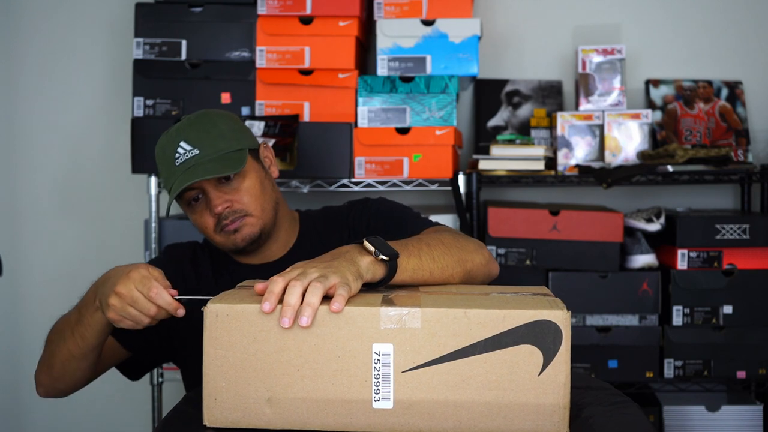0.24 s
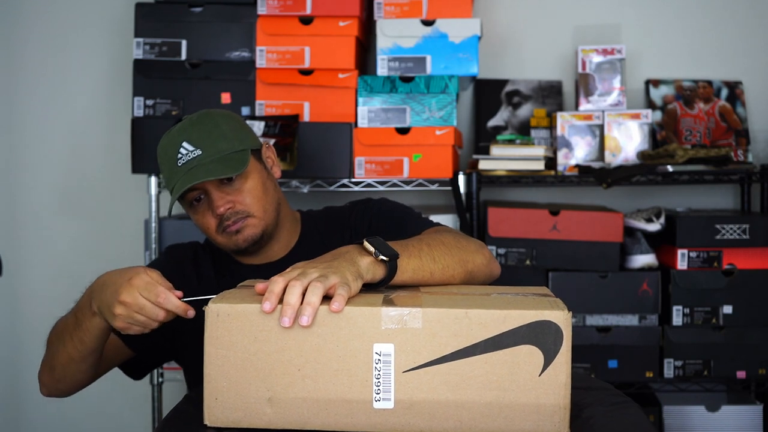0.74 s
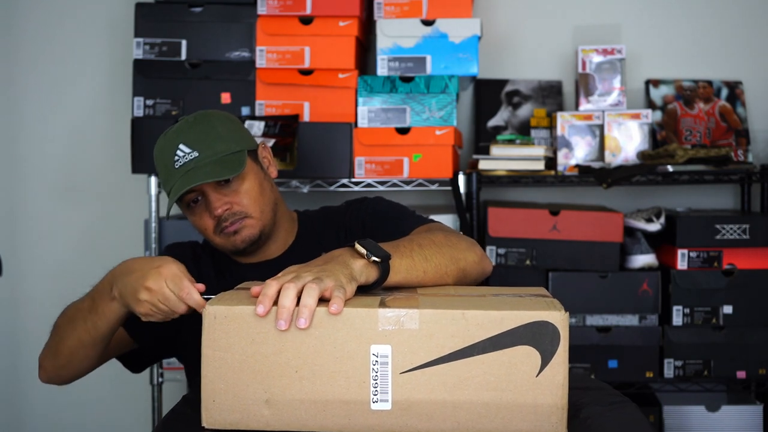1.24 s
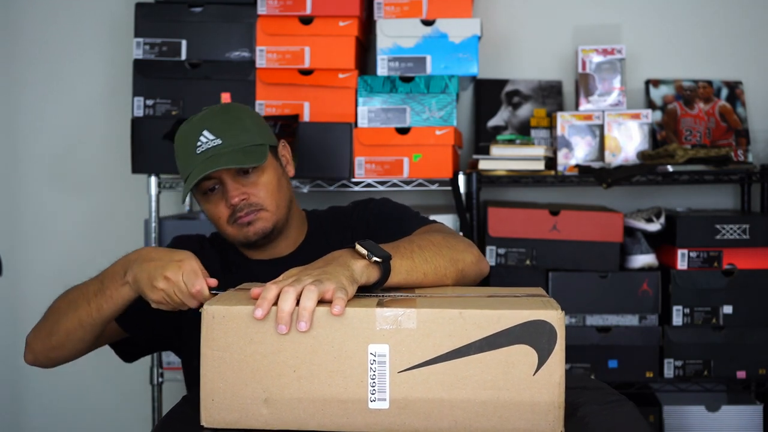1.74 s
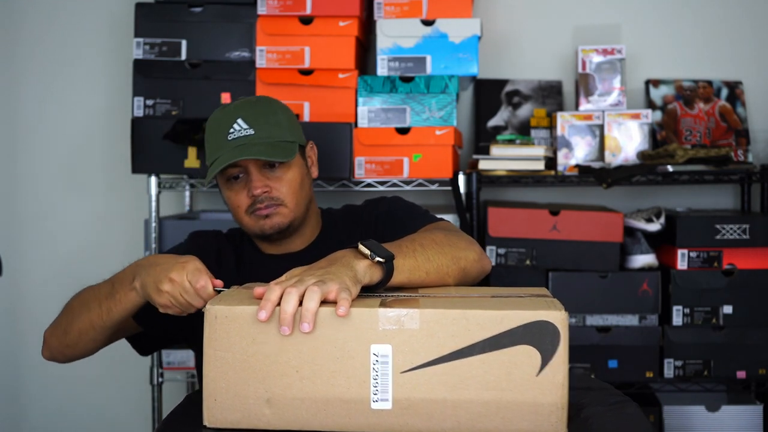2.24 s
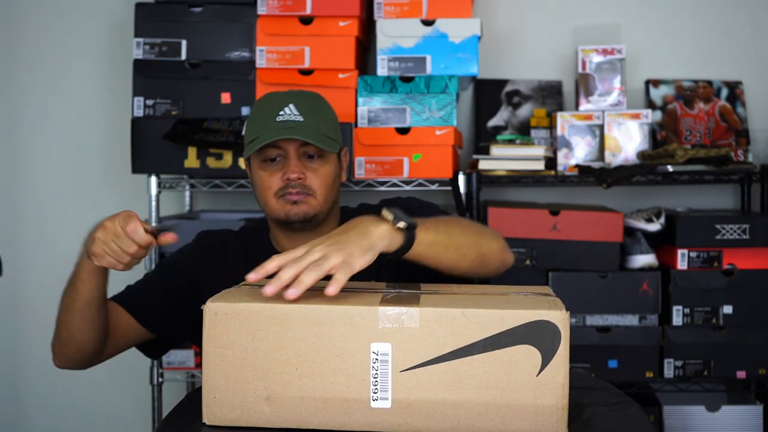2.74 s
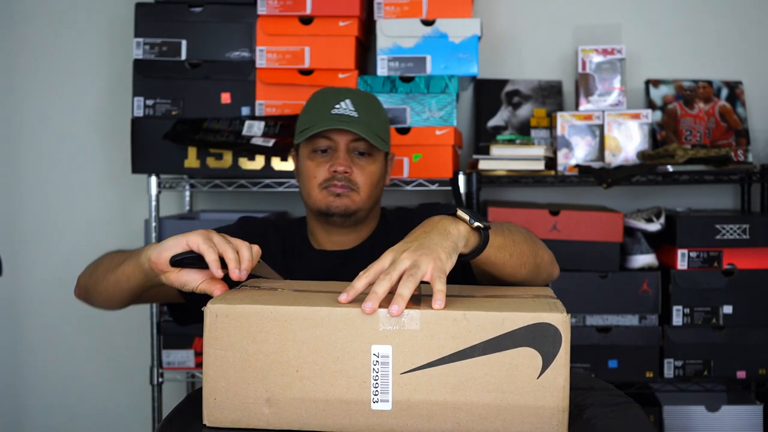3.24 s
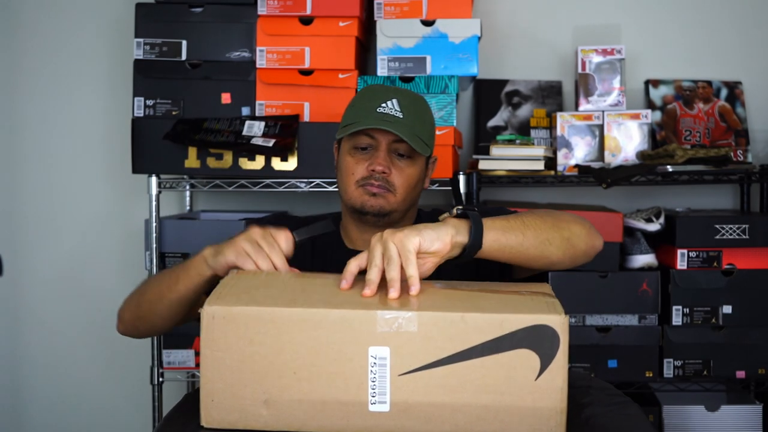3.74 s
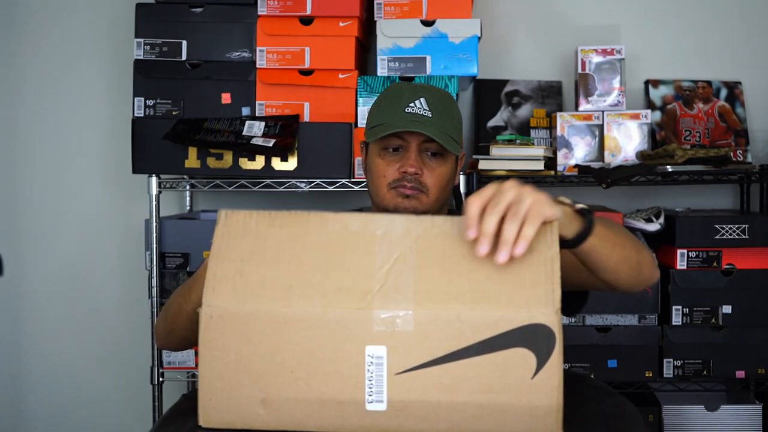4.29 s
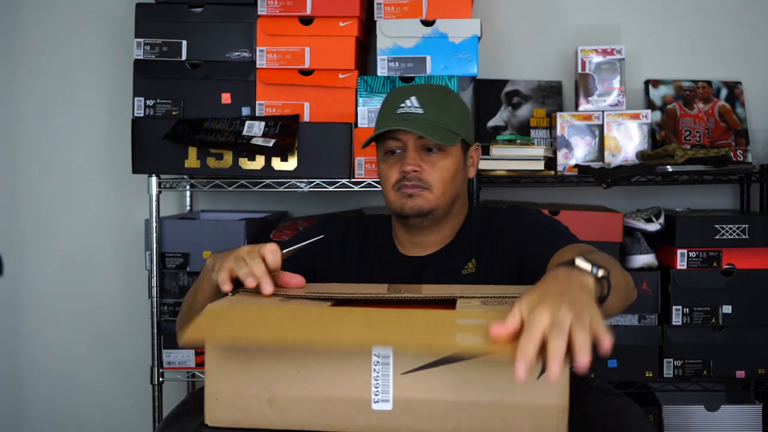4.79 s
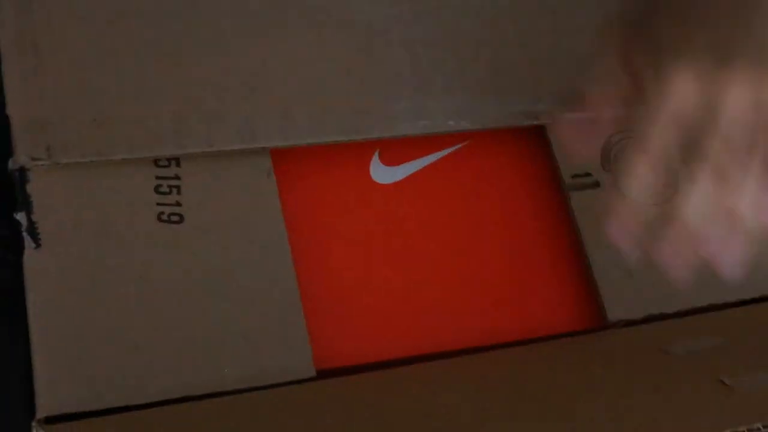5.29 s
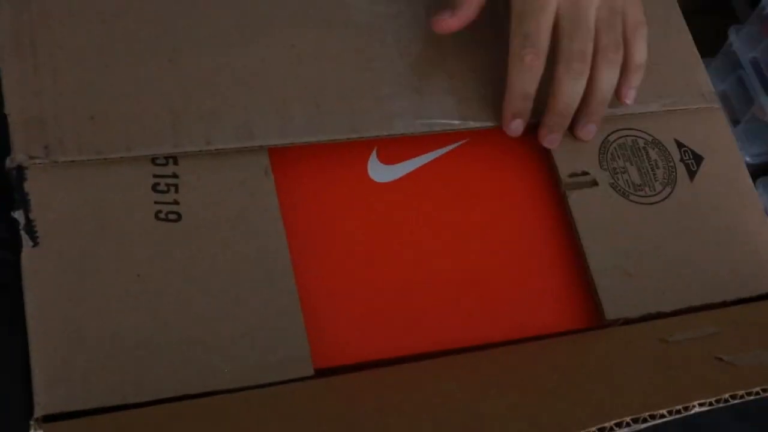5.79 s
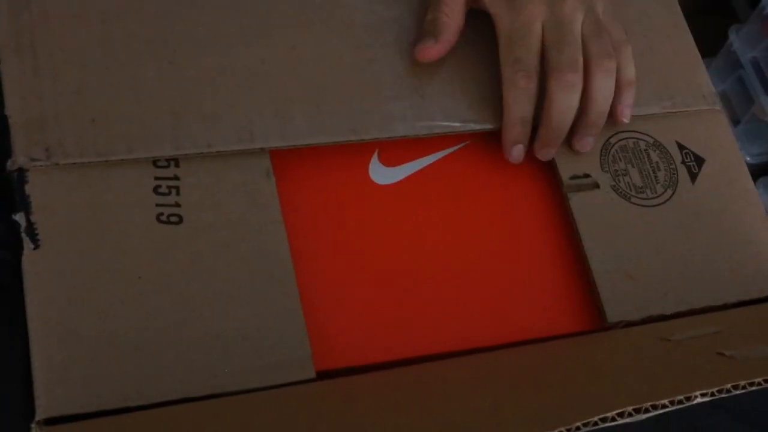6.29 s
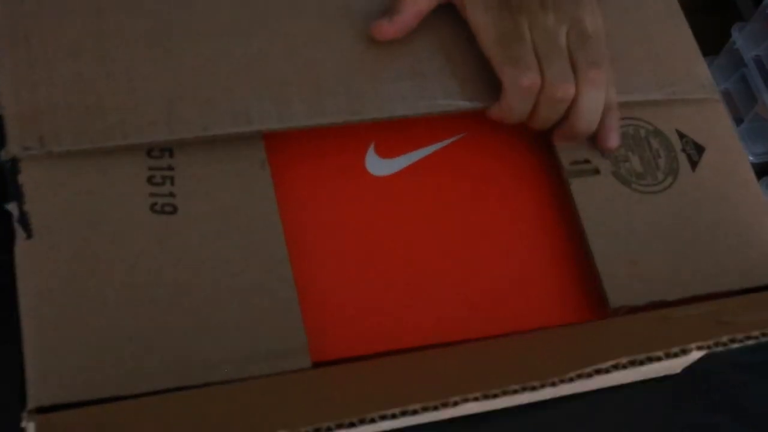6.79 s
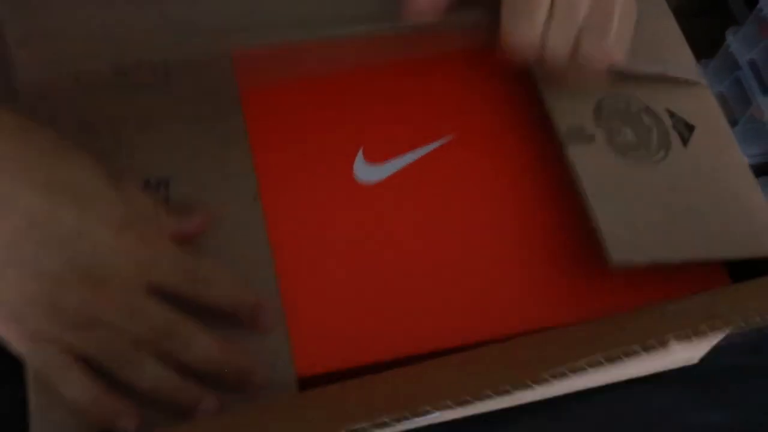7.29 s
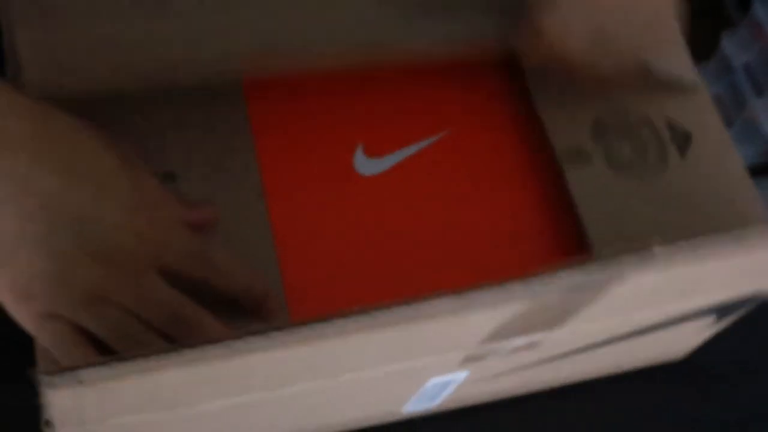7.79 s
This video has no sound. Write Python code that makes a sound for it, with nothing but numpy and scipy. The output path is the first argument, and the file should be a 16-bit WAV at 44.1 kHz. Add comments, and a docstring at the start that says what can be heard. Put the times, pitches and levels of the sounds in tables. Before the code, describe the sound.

A taped cardboard box is cut open indoors, near the microphone. Faint scratches grow into rasping knife strokes with short squeaks and hollow knocks. Sharp cracks follow as the tape gives way and the flaps scrape open. Things go briefly quiet, leaving a low hum and rumble, then the knife clicks and rattles as it is put down. Finally the cardboard is bent and pressed with loud crunching and dull thumps.

```python
"""Cutting open a taped cardboard box

A knife saws through packing tape in a quiet room, close up. Stick-slip friction booms in the hollow
box, crunches in the corrugation and hisses off the surface. The tape snaps and squeaks, flaps are
pulled open, the knife is laid aside with a rattle and hands push the flaps down with dull thuds.
A faint hum and rumble fill the pauses."""
import sys
import numpy as np
from scipy import signal
from scipy.io import wavfile
from scipy.ndimage import uniform_filter1d

SR = 44100
rng = np.random.default_rng(int(sys.argv[2]) if len(sys.argv) > 2 else 0)


def store_wav(level_fs):
    """Save 16-bit WAV to argv[1]."""
    pcm = np.round(np.clip(np.atleast_2d(level_fs), -1, 1) * 32767)
    wavfile.write(sys.argv[1], SR, pcm.T.astype(np.int16))


N = 354123

# resonances of the air in the box, its panels and its corrugated wall: f/Hz, width/Hz, gain/dB
CAVITY_MODES = [(99.4, 30.4, -4.5), (115.4, 24.6, 0), (143.6, 26.8, -0.5), (207.5, 29.6, 2.5),
                (285.5, 65, -4), (327.6, 32.6, 1)]
PANEL_MODES = [(422, 36, 0), (456, 25, 3), (509, 24.7, 1), (543.4, 23, 0), (606, 51, -9.5)]
FLUTE_MODES = [(692, 167, 0.5), (833.5, 99, 6), (1096, 244, 0.5), (1227, 169, 2.5), (1455, 178, -5),
               (1670, 410, -4.5), (2270, 660, -6), (2460, 650, -8.5)]
# tone of scraped tape and cardboard: f/Hz, gain/dB
SCRAPE_EQ = [(1180, -28.5), (2000, -9.5), (2740, -4.5), (3270, -8.5), (3530, -8), (4320, -9), (7830, -8.5),
             (10600, -16), (13800, -24.5), (15200, -26), (16200, -49.5)]


def gain(db):
    """Decibels to a factor."""
    return 10 ** (np.asarray(db) / 20)


def unit_rms(x):
    """Scales to rms 1."""
    return x / np.sqrt(np.mean(x ** 2) + 1e-20)


def at_hz(points, hz):
    """Reads a curve on a log-frequency axis."""
    f, value = np.transpose(points)
    return np.interp(np.log(hz + 1), np.log(f + 1), value)


def fader(points):
    """Gain along a curve of t/s, level/dB."""
    return gain(np.interp(np.arange(N) / SR, *np.transpose(points)))


def equalise(x, curve):
    """Minimum-phase filter with the given spectrum."""
    hz = abs(np.fft.fftfreq(8192, 1 / SR))
    log_gain = np.log(gain(at_hz(curve, hz)))
    taps = np.fft.ifft(np.exp(np.conj(signal.hilbert(log_gain)))).real[:4096]
    return signal.oaconvolve(x, taps)[:len(x)]


def ring(x, modes):
    """Parallel resonators of alternating polarity."""
    out = np.zeros(len(x))
    for k, (hz, width, db) in enumerate(modes):
        radius = np.exp(-np.pi * width / SR)
        pole = radius * np.exp(2j * np.pi * hz / SR)
        out += (-1) ** k * gain(db) * 2 * signal.lfilter([1 - radius], [1, -pole], x).real
    return out


def swells(rows):
    """One envelope per level column: each row climbs 20 dB over its rise and drops 20 over its fall."""
    rows, t = np.array(rows), np.arange(0, N + 16, 16) / SR
    late = t - rows[:, :1]
    rise, fall = np.maximum(rows[:, 1:2], .001), np.maximum(rows[:, 2:3], .005)
    shape = gain(-20 * np.where(late < 0, -late / rise, late / fall))
    powers = gain(rows[:, 3:].T) ** 2 @ shape ** 2
    return [np.interp(np.arange(N) / SR, t, np.sqrt(power)) for power in powers]


def slips(per_s, spread_db, clump_db, clump_s):
    """Stick-slip friction: clicks of random sign and size that swell in clumps."""
    clicks = (rng.random(N) < per_s / SR) * rng.choice([-1, 1], N)
    size = np.minimum(rng.exponential(1, N), 4)
    clumps = unit_rms(uniform_filter1d(rng.standard_normal(N), int(clump_s * SR)))
    return unit_rms(clicks * gain(spread_db * size + clump_db * clumps))


def patchy(x, depth_db):
    """The rubbed spot keeps changing: bands swell and fade at random."""
    bands = signal.stft(x, nperseg=256, noverlap=192)[2]
    drift = uniform_filter1d(rng.standard_normal(bands.T.shape), size=28, axis=0)
    patches = unit_rms(uniform_filter1d(drift, size=6, axis=1)).T
    return unit_rms(signal.istft(bands * gain(depth_db * patches), nperseg=256, noverlap=192)[1][:N])


def efforts():
    """Push, crush and scrape envelopes: strokes on top of the resting contact of hands and blade."""
    # cuts, pulls and pushes: peak t/s, rise/s, fall/s, push/dB, crush/dB, scrape/dB
    strokes = [(0.0, .01, 0.089, -44, -46, -38.5), (.074, 0.021, 0.17, -43, -40, -40.5),
               (0.281, 0.024, 0.049, -44, -37, -41.5), (.418, 0.055, .07, -38.5, -41.5, -48),
               (.648, 0.062, 0.082, -40, -36.5, -46), (.768, .04, 0.45, -35.5, -43.5, -43),
               (0.937, 0.047, 0.072, -25.5, -25.5, -24), (1.073, 0.086, 0.068, -22, -24.5, -30),
               (1.165, .005, 0.14, -34, -36, -38.5), (1.228, 0.07, 0.076, -12.5, -29, -27),
               (1.263, 0.027, 0.045, -19, -23, -38), (1.4, 0.094, 0.088, -17.5, -22, -34.5),
               (1.451, 0.06, 0.047, -28, -26, -28.5), (1.525, 0.022, 0.17, -22, -27.5, -31),
               (1.568, 0.097, 0.022, -13.5, -23.5, -28.5), (1.586, 0.0028, 0.095, -30, -17, -13),
               (1.643, 0.12, 0.032, -20, -29, -17), (1.674, .003, .12, -13, -36, -28),
               (1.705, 0.046, 0.086, -12.5, -23.5, -22.5), (1.759, .08, 0.054, -25, -32, -36),
               (1.984, .004, .1, -31, -44, -46), (2.011, 0.029, 0.071, -8.5, -27.5, -34),
               (2.055, 0.065, 0.041, -21, -25.5, -25.5), (2.191, 0.086, 0.067, -10.5, -23, -26.5),
               (2.292, 0.066, .13, -21.5, -22.5, -26), (2.553, .005, 0.2, -18, -28, -35),
               (2.625, 0.051, 0.054, -33, -26.5, -27.5), (2.638, .004, 0.11, -44, -20, -22),
               (2.944, .003, 0.038, -44, -37, -44.5), (2.998, .004, .3, -50, -45, -56),
               (3.06, 0.051, 0.077, -43, -36, -36.5), (3.129, 0.0018, 0.069, -20, -14, -15.5),
               (3.27, 0.049, 0.032, -30.5, -49, -40), (3.339, 0.053, 0.09, -31, -36, -49),
               (3.411, 0.056, 0.12, -35, -32.5, -41.5), (3.513, 0.097, 0.045, -27.5, -55, -56),
               (3.555, 0.064, 0.58, -39.5, -33.5, -41), (3.704, .003, 0.065, -25, -8.5, -31),
               (3.733, 0.043, 0.045, -22, -27, -25), (3.755, .003, 0.11, -31, -16, -26),
               (3.815, 0.11, 0.044, -22.5, -25, -26.5), (3.85, .015, 0.013, -12, -23, -42),
               (3.873, .003, 0.027, -15, -21.5, -44), (3.95, 0.036, 0.083, -15, -15.5, -18),
               (4.068, 0.0025, 0.083, -8, -12, -34), (4.144, 0.091, 0.063, -17, -14, -20.5),
               (4.2, 0.14, 0.31, -34.5, -29, -30), (4.404, 0.24, .08, -34.5, -31, -34),
               (4.508, 0.041, 0.053, -48, -36.5, -35.5), (4.582, 0.11, 0.067, -34.5, -39, -58),
               (4.735, 0.06, 0.28, -25, -31, -37), (4.958, .05, 0.14, -31, -44, -43),
               (5.006, 0.15, 0.042, -26, -32, -40), (5.093, 0.077, 0.081, -37, -29, -29),
               (5.49, 0.021, 0.11, -62, -50, -70), (5.673, .003, 0.1, -37, -38.5, -53),
               (5.849, .04, 0.092, -43, -55.5, -72), (6.668, 0.0037, 0.16, -28.5, -40, -40),
               (6.724, .01, 0.077, -27, -34.5, -47), (6.786, .004, 0.33, -20.5, -40, -44.5),
               (6.858, 0.067, .05, -17.5, -24, -42.5), (6.903, .006, 0.25, -24.5, -27.5, -38.5),
               (7.022, 0.098, 0.027, -24, -31, -33), (7.045, 0.024, 0.064, -5, -14, -29),
               (7.099, 0.16, .13, -15, -16, -29.5), (7.221, 0.0023, 0.072, -10, -8.5, -14),
               (7.27, 0.11, 0.025, -10.5, -34, -18), (7.322, 0.1, 0.064, -13.5, -20, -17.5),
               (7.413, 0.006, 0.022, -14.5, -8, -12), (7.46, 0.14, 0.11, -15.5, -14.5, -19),
               (7.618, .005, 0.099, -31, -30, -43), (7.663, .012, .3, -22.5, -26, -33),
               (7.795, 0.12, 0.1, -36, -34, -27), (7.855, 0.11, 0.089, -19.5, -25, -28.5),
               (7.999, .04, 0.25, -18, -29.5, -35)]
    # resting contact: t/s, level/dB
    contact = [(0, -64), (.8, -69), (1.3, -31.5), (1.8, -46), (1.96, -46), (2.1, -36), (2.4, -34),
               (2.53, -35.5), (2.8, -74), (3.0, -48), (3.25, -44), (3.68, -40), (4.3, -48), (4.66, -41),
               (5.15, -53), (5.3, -55.5), (6.6, -70), (6.78, -53), (7.6, -32.5), (8.03, -55)]
    push, crush, scrape = swells(strokes)
    rest = fader(contact)
    return (np.hypot(push, gain(-4) * rest),
            np.hypot(crush, gain(-2.5) * rest),
            np.hypot(scrape, gain(-9) * rest))


def room_tone():
    """Room air, a fading midrange hiss, low rumble, bumps through the table and mains hum."""
    # tone of the air and of the hiss: f/Hz, gain/dB
    air_eq = [(40, -14), (110, -11.5), (200, -11), (400, -17), (1100, -25), (2600, -25), (7000, -31.5),
              (12600, -34.5), (16200, -40)]
    hiss_eq = [(300, -13.5), (600, -1), (1300, 5), (2900, 1.5), (3300, -23)]
    # ride of the rumble: t/s, level/dB
    rumble_ride = [(0.0, -54), (1.07, -60), (1.54, -36), (2.03, -42), (2.48, -29), (2.66, -48),
                   (3.49, -40.5), (3.6, -45), (4.18, -34), (4.23, -50), (4.4, -35), (5.39, -62),
                   (5.75, -38), (6.04, -57), (6.49, -35), (6.62, -50), (6.8, -34), (8.03, -36)]
    # mains partials: f/Hz, level/dB
    hum_partials = [(59.5, -61), (119, -58), (240, -55)]
    air_noise, rumble_noise, bump_noise, hiss_noise = rng.standard_normal((4, N))
    t = np.arange(N) / SR
    rumble_mode, table_mode = [(29.2, 11.5, 0)], [(55, 30, 0)]  # f/Hz, width/Hz, gain/dB
    air = gain(-56) * unit_rms(equalise(air_noise, air_eq))
    hiss = gain(-45.5 - 21 * t) * unit_rms(equalise(hiss_noise, hiss_eq))
    rumble = fader(rumble_ride) * unit_rms(ring(ring(rumble_noise, rumble_mode), rumble_mode))
    lag = np.exp(-1 / (0.073 * SR))  # the table takes up the pushes slowly
    shake = gain(-20.5) * signal.lfilter([1 - lag], [1, -lag], efforts()[0]) + gain(-56)
    bumps = shake * unit_rms(ring(ring(bump_noise, table_mode), table_mode))
    hum = sum(gain(db) * np.sin(2 * np.pi * hz * t) for hz, db in hum_partials)
    return air + hiss + rumble + bumps + hum


def reverb(x):
    """Sparse room echoes of random sign, each band dying at its own speed."""
    # decay of the room: f/Hz, t60/s
    decay = [(100, 0.27), (500, 0.14), (2000, 0.26), (8000, 0.31), (16000, 0.07)]
    taps = np.zeros(SR // 2)
    slots = np.arange(200, SR // 2 - 20, 20)
    taps[slots + rng.integers(0, 20, len(slots))] = rng.choice([-1., 1.], len(slots))
    hz, t, bands = signal.stft(taps, SR, nperseg=256)
    tail = signal.istft(bands * gain(-60 * t / at_hz(decay, hz)[:, None]), SR, nperseg=256)[1]
    return signal.oaconvolve(x, tail / np.linalg.norm(tail))[:N]


def rattle(moves, modes):
    """Friction rings the dull and the bright modes; fast contacts open with a short hard burst."""
    friction = patchy(slips(per_s=6000, spread_db=1.3, clump_db=1.1, clump_s=0.0093), depth_db=0.85)
    strikes = swells([(s, 0.0011, 0.005, dull_db + 3, bright_db + 3)
                      for s, rise, _, dull_db, bright_db in moves if rise < .03])
    dull = [mode for mode in modes if mode[0] < 3000]
    bright = [mode for mode in modes if mode[0] >= 3000]
    return sum(ring((level + strike) * friction, band) / np.std(ring(friction, band))
               for level, strike, band in zip(swells(moves), strikes, (dull, bright)))


def knife_laid_aside():
    """The knife slides, then is knocked; handle and shelf ring."""
    # moves of the knife: peak t/s, rise/s, fall/s, dull/dB, bright/dB
    slides = [(5.958, 0.0019, 0.082, -27.5, -33), (6.02, 0.042, 0.18, -41, -44),
              (6.097, 0.068, 0.11, -38.5, -38.5)]
    knocks = [(6.274, .002, 0.11, -26.5, -29), (6.31, .003, 0.033, -23.5, -27.5),
              (6.328, 0.059, 0.091, -23.5, -30), (6.4005, .002, .05, -28.5, -30),
              (6.415, 0.036, 0.099, -26.5, -32.5), (6.505, 0.22, 0.16, -33, -45.5)]
    # resonances of handle and shelf: f/Hz, width/Hz, gain/dB
    slide_modes = [(497, 190, -4), (1094, 90, 2.5), (1460, 100, -4), (2170, 103, 2.5), (3420, 660, -15.5),
                   (4000, 520, -14.5), (5070, 400, -11.5), (6200, 640, -20), (7300, 1300, -15.5),
                   (8900, 670, -17.5), (10000, 500, -19), (13300, 1340, -21)]
    knock_modes = [(120, 21, -2.5), (254.7, 12, 3.5), (366, 38, -5), (630, 150, -8), (855, 100, -6),
                   (1192, 41, 2), (1480, 44, 0), (1646, 87, -5.5), (2020, 126, -6), (2570, 180, -11.5),
                   (3580, 600, -11.5), (4600, 630, -11), (5440, 360, -4), (5870, 230, -2), (6700, 300, -8),
                   (8400, 2700, -20), (11930, 3500, -24.5)]
    return rattle(slides, slide_modes) + rattle(knocks, knock_modes)


def wafts():
    """Swinging flaps fan the air in soft bass puffs."""
    # puffs of air: t/s, level/dB, f/Hz, t60/s
    puffs = [(1.04, -36, 60, 0.22), (4.074, -12, 56.4, 0.49), (4.56, -18, 61, 0.26),
             (6.84, -20.5, 56.6, 0.73), (7.27, -14.5, 56, 0.58)]
    out, t = np.zeros(N + SR), np.arange(SR // 2) / SR
    attack = 1 - np.exp(-t / 0.018)
    for s, db, hz, t60 in puffs:
        out[round(s * SR):][:len(t)] += gain(db - 60 * t / t60) * attack * np.sin(2 * np.pi * hz * t)
    return out[:N]


def thuds():
    """Each blow is a few smooth cycles of force, heard directly and ringing on in the box."""
    # dull blows on the box: t/s, level/dB, f/Hz
    blows = [(.801, -34, 199), (0.931, -41, 208), (1.064, -20.5, 106), (1.222, -12, 116), (1.252, 3, 215),
             (1.391, -4, 287), (1.429, 1.5, 298), (1.452, -7, 208), (1.54, -10, 190), (1.686, -4, 293),
             (1.702, -1.5, 300), (1.754, -3.5, 537), (2.006, -3, 196), (2.017, -19, 199),
             (2.171, -10.5, 163), (2.287, -2, 510), (2.55, -5, 141.6), (2.644, -17, 517),
             (3.135, -8.5, 196), (3.329, -24, 156), (3.464, -22, 205), (3.705, -10, 510),
             (3.849, -9, 150.5), (3.87, -22, 155), (3.945, -5, 497), (4.0689, -2, 510), (4.0724, 1, 416),
             (4.096, 0.5, 540), (4.113, -2.5, 230), (4.73, -18, 206), (4.814, -19, 204), (4.863, -16, 322),
             (4.989, -23, 208), (5.671, -21.5, 432), (6.689, -28, 199), (6.785, -13.5, 210),
             (6.837, -11, 202), (6.86, -18, 205), (6.9, -6, 209), (6.935, -8, 200), (7.032, 2, 178),
             (7.051, -3, 325), (7.103, 3.5, 313), (7.2195, 2.5, 440), (7.264, 6.5, 500), (7.285, -8, 495),
             (7.412, -1, 553), (7.661, -9.5, 147), (7.838, -5, 496), (7.993, -10, 157)]
    force, t = np.zeros(N + SR), np.arange(3000) / SR
    cycles = 3.3
    for s, db, hz in blows:
        progress = np.minimum(t * hz / cycles, 1)
        envelope = np.sin(np.pi * progress ** 0.51)  # peaks early
        force[round(s * SR):][:len(t)] += gain(db) * envelope * np.sin(2 * np.pi * cycles * progress)
    return (gain(-9.5) * force + gain(-7.5) * ring(force, CAVITY_MODES + PANEL_MODES))[:N]


def squeaks():
    """Stretched tape and bent flaps squeak: narrow gliding noise bands that start at once and fade."""
    # squeaks: t/s, length/s, start f/Hz, end f/Hz, level/dB
    glides = [(0.278, 0.043, 7160, 7000, -51), (1.61, 0.035, 4440, 5200, -27),
              (1.674, 0.068, 7250, 6870, -19), (1.675, 0.089, 3480, 3750, -25),
              (2.205, 0.06, 5700, 4880, -31), (7.013, 0.025, 1274, 1180, -20),
              (7.203, 0.019, 1245, 1350, -20)]
    out = np.zeros(N)
    for s, length, start_hz, end_hz, db in glides:
        progress = np.arange(round(length * SR)) / (length * SR)
        waver = uniform_filter1d(rng.standard_normal((2, 8000)), size=45)[:, :len(progress)]
        phase = 2 * np.pi * np.cumsum(start_hz + (end_hz - start_hz) * progress) / SR
        tone = waver[0] * np.cos(phase) - waver[1] * np.sin(phase)
        out[round(s * SR):][:len(tone)] += gain(db) * unit_rms(tone) * (1 - progress ** 2)
    return out


def snaps_and_knocks():
    """Tape and cardboard snap, the knife clicks as it is laid down: tick, crack, longer ring and rap."""
    # snaps and knife clicks: t/s, level/dB, ring f/Hz, rap/dB, relative ring level/dB
    hits = [(0.067, -32, 3190, -30, 0), (0.174, -29, 9000, -28, -7), (0.2825, -21.5, 6950, -39, -3),
            (.9281, -13, 8140, -31, 3.5), (1.3756, -16.5, 3020, -10, -3), (1.588, 8.5, 4410, -1, -20),
            (1.6735, 12, 7260, -2, -17), (1.987, -21, 7330, -19, -6), (2.124, -14, 4010, -27, -9),
            (2.1943, -2, 4900, -33, -10.5), (2.2963, -21, 6700, 2, -3), (2.3195, 2, 2600, -28, -19),
            (2.5516, -32, 2880, -24, -10), (2.6356, -1.5, 7350, -21, -2), (2.809, -27.5, 7060, -53, 2),
            (2.847, -21.5, 4800, -59, -10), (2.943, -33.5, 3200, -28, 3), (3.1169, -15.5, 7110, -14.5, -5),
            (3.1317, 5.5, 3030, 2, -9), (3.144, -5, 4900, -8, 0), (3.6223, -18.5, 2630, -19, -6),
            (3.704, 4, 8840, -11, -28), (3.7114, 3, 7300, -25, -9), (3.7557, 6, 8740, -6, -10.5),
            (3.8123, -4, 4860, -16, -9.5), (3.8717, -18, 2830, 2.5, -4), (3.908, -13, 7200, -31, -7),
            (3.9431, -0.5, 7990, 4.5, -11), (4.073, -1, 2400, 1, -2), (4.488, -21, 8600, -23, 0),
            (5.6715, -42, 2770, -20, 3), (5.9558, -14, 5060, -46, -12), (6.2726, -18.5, 6770, -38, 11),
            (6.309, -16, 6800, -33, 0), (6.4012, -26, 5850, -42, 5), (6.668, -36, 7260, -35, 0),
            (6.786, -26, 6840, -10.5, -7), (6.905, -27, 4340, -20, -4), (6.9491, -9, 3540, -25, -22),
            (7.0155, -17, 2600, -11, -5), (7.033, -16, 2600, -14, 4), (7.0435, -5, 2640, -14, -5),
            (7.0502, 3, 7500, 2.5, -13), (7.2205, 0.5, 5660, -11, -17), (7.263, -1, 2710, -22, -6),
            (7.4117, -6.5, 3100, -1, 4.5), (7.6165, -18.5, 8350, -10.5, 2), (7.661, -5, 3730, -2.5, -19),
            (7.6978, -18, 2750, -36, 6), (7.7362, -15, 8150, -18, -1), (7.984, -14, 5530, -24, -10)]
    t = np.arange(8800) / SR
    out, raps = np.zeros((2, N + len(t)))
    tick_decay, ring_decay = gain(-60 * t / 0.002), gain(-60 * t / 0.1)
    crack_decay = 0.26 * gain(-60 * t / 0.048) + 0.16 * gain(-60 * t / 0.0042)
    for s, db, ring_hz, rap_db, ring_db in hits:
        noise = rng.standard_normal(len(t))
        tick = ring(np.sign(noise) * tick_decay, [(7500, 4300, -6.5)])
        crack = equalise(noise * crack_decay, SCRAPE_EQ)
        ringing = ring(noise * ring_decay, [(ring_hz, 540, ring_db)])
        out[round(s * SR):][:len(t)] += gain(db) * (tick + crack + ringing)
        raps[round(s * SR):][:len(t)] += gain(rap_db - 60 * t / 0.005) * abs(noise)
    return (out + gain(3.5) * ring(raps, FLUTE_MODES) + gain(5) * ring(raps, PANEL_MODES))[:N]


def box_friction(push, crush, scrape):
    """Slow slips shake the hollow box and its panels, quicker ones the corrugation."""
    # flaps bend and their panels hum: peak t/s, rise/s, fall/s, level/dB
    bends = [(0, .01, 0.044, -40), (.074, .025, 0.5, -45.5), (1.337, .06, .1, -22),
             (2.057, 0.05, 0.041, -21.5), (2.295, .04, 0.031, -26), (3.957, 0.032, 0.032, -8.5),
             (4.404, 0.4, 0.044, -32.5), (7.01, 0.065, 0.059, -23.5), (7.085, 0.13, 0.053, -13.5),
             (7.27, 0.057, .05, -18.5), (7.322, .1, 0.031, -13.5), (7.427, 0.041, 0.038, -13),
             (7.855, 0.14, 0.02, -22)]
    boom = slips(per_s=700, spread_db=1.42, clump_db=1.24, clump_s=0.022)
    crunch = patchy(slips(per_s=4000, spread_db=4.1, clump_db=0.85, clump_s=0.0055), depth_db=2.4)
    flex = np.hypot(push ** 0.56 * crush ** 0.65, swells(bends)[0])
    graze = crush ** 0.76 * scrape ** 0.43  # the upper modes answer to scraping as well
    layers = [(push, boom, CAVITY_MODES, -3.5), (flex, boom, PANEL_MODES, -2.5),
              (crush, crunch, FLUTE_MODES[:5], -3), (graze, crunch, FLUTE_MODES[5:], -5)]
    return sum(gain(db) * ring(envelope * drive, modes) / np.std(ring(drive, modes))
               for envelope, drive, modes, db in layers)


def surface_scrape(scrape):
    """The finest slips hiss off the surface and single fibres break; a finer scrape is brighter."""
    # fineness of the scrape: t/s, lift of each treble shelf/dB
    fineness = [(0, 0), (.9, 1.5), (2.2, 3), (3.1, 2), (3.7, 4), (4.1, 1.5), (4.4, 5), (5.7, 0.5),
                (6.9, 3.5), (7.2, -1.5), (8.03, 1.5)]
    hiss = slips(per_s=12000, spread_db=0.39, clump_db=1.5, clump_s=0.0052)
    fibres = .3 * slips(per_s=250, spread_db=3, clump_db=1.5, clump_s=.02)
    rasp = patchy(equalise(hiss + fibres, SCRAPE_EQ), depth_db=2.1)
    for shelf_hz in (6300, 10500):
        treble = signal.oaconvolve(rasp, signal.firwin(31, shelf_hz, pass_zero=False, fs=SR), "same")
        rasp = rasp + (fader(fineness) - 1) * treble
    return gain(-2.5) * scrape * rasp


def scene():
    """The close sounds of box and knife with a little reverb, over room tone; mono."""
    push, crush, scrape = efforts()
    cardboard = box_friction(push, crush, scrape) + surface_scrape(scrape)
    close = cardboard + snaps_and_knocks() + squeaks() + thuds() + wafts() + knife_laid_aside()
    return (close + gain(-10.5) * reverb(close) + room_tone())[None]


def record(dry):
    """The loudest snaps clip, then a steep low-pass trims the top."""
    clipped = np.clip(dry, -.97, .97)
    lowpass = signal.firwin(511, 15900, window=("kaiser", 9), fs=SR)
    return signal.oaconvolve(clipped, lowpass[None], "same")


dry = scene()
out = record(dry)
store_wav(out)
```